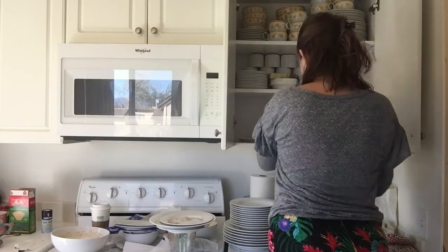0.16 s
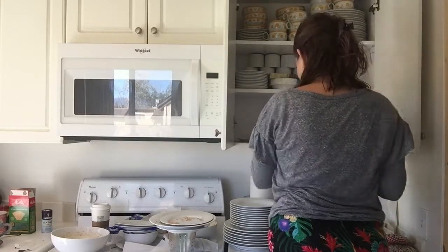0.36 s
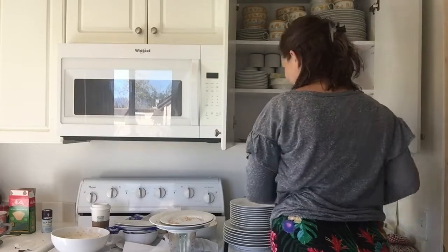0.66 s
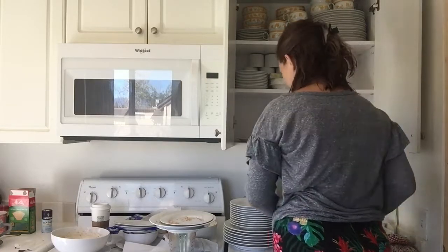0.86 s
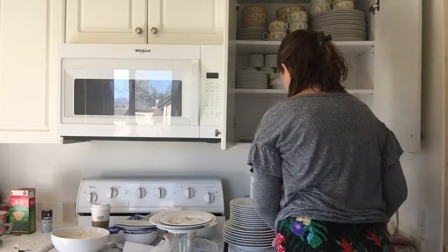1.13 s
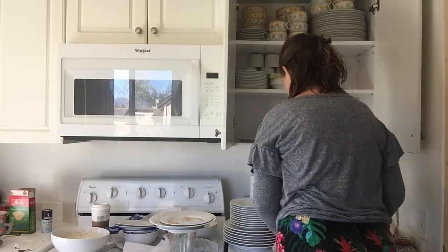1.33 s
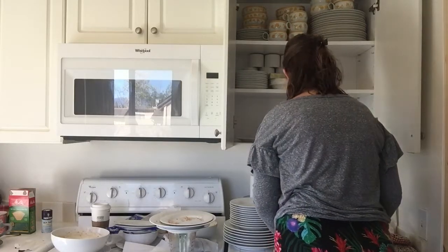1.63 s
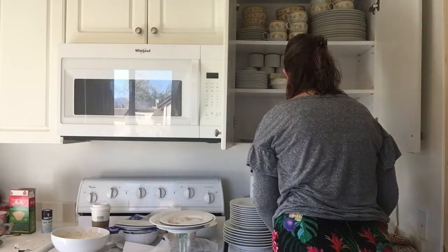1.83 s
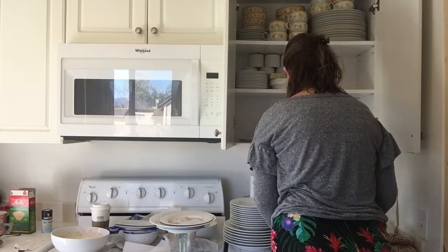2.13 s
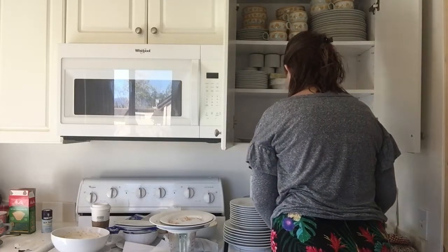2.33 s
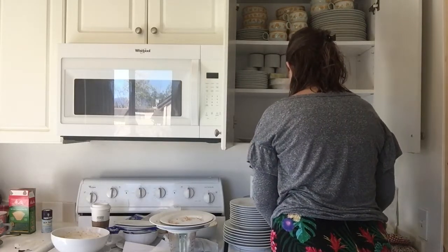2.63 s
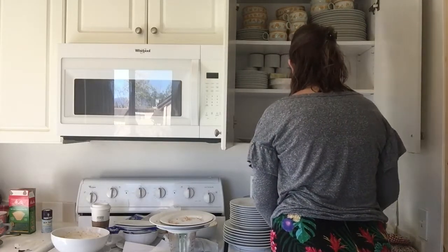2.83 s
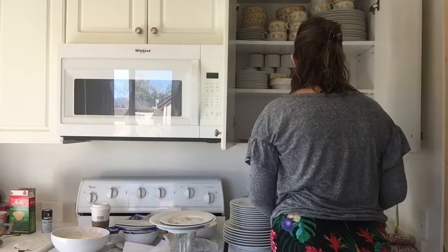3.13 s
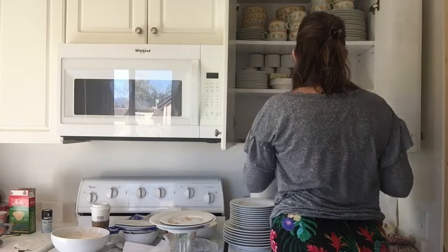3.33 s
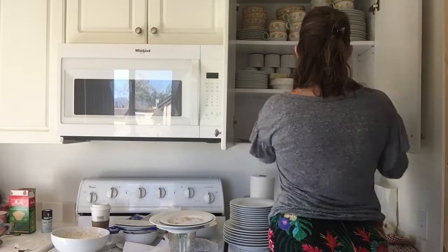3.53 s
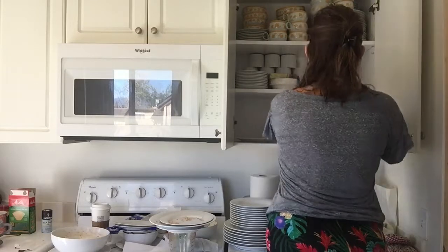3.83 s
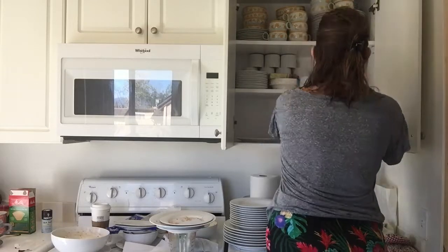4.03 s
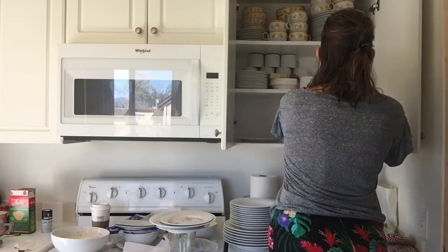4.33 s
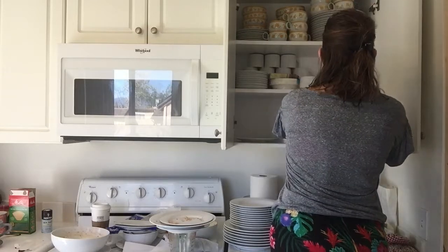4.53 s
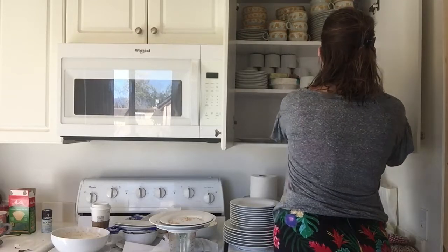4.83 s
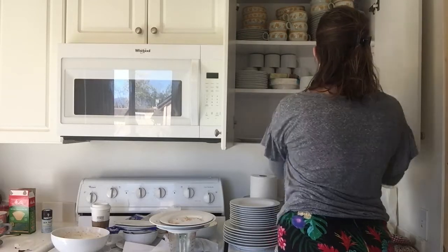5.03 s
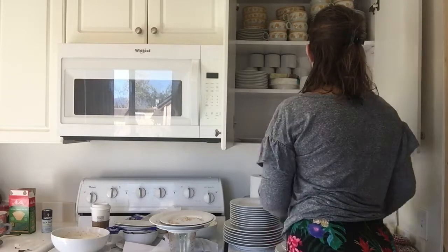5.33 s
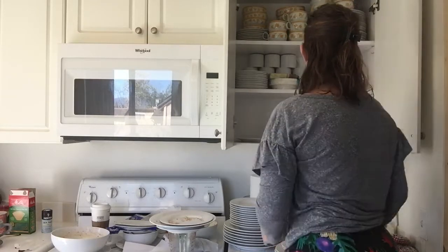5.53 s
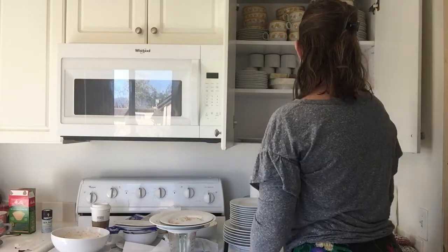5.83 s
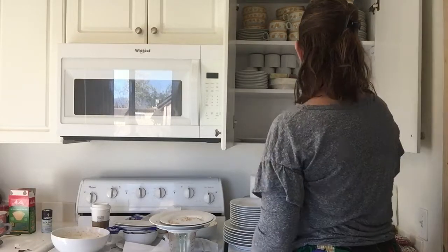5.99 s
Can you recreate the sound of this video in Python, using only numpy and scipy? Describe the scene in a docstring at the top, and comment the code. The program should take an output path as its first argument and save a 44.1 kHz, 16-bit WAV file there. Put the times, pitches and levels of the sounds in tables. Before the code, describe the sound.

Stoneware mugs clink and knock onto a wooden shelf in a kitchen, then a cupboard door knocks shut over a faint fridge hum.

```python
"""Stoneware mugs are lifted from a counter and set on a wooden shelf; then a cupboard door knocks shut.
Each contact is a chatter of impacts that excites the damped normal modes of ware and wood: a crack,
a thump and a ring. A body screens the direct path, so the kitchen's reverberation carries most of the
crack. A fridge hums as steady coloured noise; midway, a low amplitude-modulated throb passes outside."""
import sys
import numpy as np
from scipy import signal
from scipy.fft import rfft, irfft
from scipy.io import wavfile

SR = 44100
rng = np.random.default_rng(int(sys.argv[2]) if len(sys.argv) > 2 else 0)


def bounce(signal):
    """Save signal as a 16-bit WAV file at the path given by the first command-line argument."""
    frames = np.transpose(np.atleast_2d(signal))
    limited = np.clip(frames, -1, 1)
    pcm = np.round(limited * 32767).astype(np.int16)
    wavfile.write(sys.argv[1], SR, pcm)


N = 271656

# mug contacts on counter and shelf, then, after 5.4 s, the wooden knocks of a cupboard door:
# t/s, blow on ware/dB, blow on wood/dB, brightness/dB, ringing/dB,
# board note f/Hz, hollow note f/Hz, rim note f/Hz, glaze note f/Hz
IMPACTS = [(0.001, -44, -56, -11, -8.5, 528, 1142, 2100, 3500),
           (0.173, -54.5, -85, -17.5, 0.5, 382, 1450, 2650, 3560),
           (0.235, -55.5, -61, -8, 2.5, 440, 833, 2664, 7890),
           (0.265, -58.5, -65, -23, 6, 430, 850, 2357, 3380),
           (0.347, -41, -61, -18, 4, 425, 824, 1390, 8020),
           (0.371, -27, -45, -6.5, -9.5, 446, 1350, 2707, 8020),
           (0.495, -48.5, -53.5, -29, -3.5, 425, 1110, 2050, 3700),
           (0.623, -55, -59, -16, -4, 570, 1200, 1960, 3700),
           (0.646, -41.5, -33.5, 1.5, -19.5, 695, 940, 2110, 5700),
           (0.692, -27, -48.5, -13, -9.5, 440, 2080, 1500, 7375),
           (0.921, -68.5, -58, -30, 0.5, 482, 1040, 1261, 3300),
           (1.095, -47, -54.5, -22, -2, 436, 1053, 1740, 4700),
           (1.232, -68.5, -75, -8, 2, 390, 1380, 2277, 3300),
           (1.504, -64.5, -67, -35, -0.5, 505, 1290, 1640, 3300),
           (1.653, -18, -26.5, -3.5, -7.5, 360, 775, 4446, 6955),
           (1.748, -23.5, -29, -6.5, -6.5, 396, 1250, 2271, 4128),
           (1.875, -36.5, -29, -11, -20, 414, 734, 1540, 4500),
           (1.908, -20, -23.5, -3, -6.5, 330, 763, 1560, 4532),
           (1.986, -29, -45, -7, -9, 392, 1369, 2217, 7950),
           (2.09, -48, -44, -27, -11.5, 294, 1100, 2270, 3700),
           (2.143, -34.5, -22.5, -2.5, -29, 406, 1080, 1730, 3700),
           (2.163, -21.5, -35, -3.5, -5, 395.4, 1199, 2099, 5528),
           (2.45, -68.5, -42, -27, -27, 370, 950, 1580, 3500),
           (2.49, -50.5, -49, -33, -7, 266, 940, 1550, 3500),
           (2.529, -49, -66, -20, -1.5, 386, 1090, 2410, 3500),
           (2.576, -45, -57, -12, -25, 300, 1060, 2080, 4470),
           (2.61, -37.5, -39.5, -11, -7, 577, 1063, 2100, 4470),
           (2.645, -39.5, -52.5, -16, 2, 326, 1057, 2096, 5577),
           (2.75, -20.5, -40.5, -6.5, -13.5, 390, 936, 5517, 3550),
           (2.882, -41, -42, -11, -19, 312, 945, 2720, 5510),
           (2.917, -30, -45, -1.5, -8, 320, 1088, 3600, 7800),
           (2.94, -15.5, -29, -1.5, -10, 376, 1040, 2138, 5507),
           (2.966, -23, -41.5, -2, -5, 385, 1960, 4263, 5512),
           (3.33, -42.5, -52.5, -18.5, -3, 600, 1060, 2083, 4462),
           (3.44, -30, -47, -18.5, -12, 503, 1240, 2083, 3563),
           (3.46, -25.5, -43, -8.5, -8.5, 508, 1340, 2070, 7760),
           (3.535, -29, -51.5, -8, -5, 404, 744, 2670, 7830),
           (3.557, -27.5, -48.5, -8.5, -17, 410, 850, 2089, 5200),
           (3.764, -40, -62.5, -10, -9, 614, 1410, 2304, 7900),
           (4.039, -32, -69, -12.5, -6, 374, 870, 1697, 7730),
           (4.387, -16.5, -27, -0.5, -6, 381.5, 949, 3272, 6611),
           (4.733, -16, -29.5, 1, -3.5, 400, 1354, 2085, 4570),
           (5.447, -40.5, -37.5, 1, -16.5, 568, 838, 1280, 4100),
           (5.558, -30.5, -28.5, -2, -14.5, 709, 1050, 2950, 4085),
           (5.606, -63.5, -44, -20, 3, 546, 1000, 1507, 3200),
           (5.676, -52.5, -40.5, -29, -4, 490, 731, 1700, 3200),
           (5.712, -53.5, -51.5, -2.5, -18, 750, 1220, 2220, 4100),
           (5.822, -51.5, -44, -2.5, -8.5, 726, 900, 2320, 4100),
           (6.059, -39, -36.5, -6.5, -12, 723, 1395, 2260, 3300)]
# knock, boom, thud, clack, clink, tick and sparkle bands of an impact: lower f/Hz, upper f/Hz
IMPACT_BANDS = [(550, 1400), (55, 190), (215, 550), (1400, 3000), (3000, 6500), (6500, 8800), (8800, 14500)]
# gaps between the clusters of short modes that colour the crack: f/Hz, width/Hz, gain/dB
MODE_GAPS = [(650, 490, -5.5), (4860, 430, -7), (5880, 470, -6.5), (8700, 1100, -13.5), (10930, 480, -19.5),
             (13600, 930, -15.5)]
# normal modes of the stoneware: f/Hz, level/dB, T60/s
WARE_MODES = [(920, -16.5, 0.13), (1345, -9.5, 0.17), (1633.5, 3, 0.08), (1792, 4.5, 0.03),
              (2188, -5.5, 0.12), (2076, -8, 0.16), (5560, -6, 0.13), (3036, -5.5, 0.057),
              (3250, -10, 0.11), (3654, 0, 0.11), (4326, -2.5, 0.14), (4560, -5, 0.24), (6340, -2, 0.17),
              (6760, -3, 0.073), (7690, 2.5, 0.17), (8060, -1, 0.14), (9890, 8, 0.069), (11170, -1.5, 0.08),
              (12500, -12.5, .12), (14450, -15, .14)]
# normal modes of the wood (shelf, counter and door): f/Hz, level/dB, T60/s
WOOD_MODES = [(260, -11, 0.15), (302, -11.5, 0.099), (384.6, -7.5, 0.086), (444, -10, 0.64),
              (844, -18, 0.18), (1016, -12.5, 0.21)]
# board, hollow, rim and glaze notes: level/dB, T60/s, multiplier of the impact's ringing level
NOTE_MODES = [(24.5, 0.094, 0.85), (20.5, 0.12, 1.61), (17, 0.39, 1.07), (20.5, 0.14, 1.8)]
# reverberation time of the kitchen: f/Hz, T60/s
REVERB_TIMES = [(100, 0.22), (400, 0.23), (1200, 0.26), (4000, 0.27), (9000, 0.23), (15000, 0.16)]
# spectral density of fridge and room noise: f/Hz, relative level/dB
FRIDGE_SPECTRUM = [(25, -22.5), (43, -3), (84, -3), (117, 4), (185, -11), (256, -9.5), (659, -9.5),
                   (818, -10.5), (5570, -21), (16000, -29.5)]
# envelope of the throb: t/s, level/dB
THROB_ENVELOPE = [(2.25, -51), (2.42, -56.5), (2.7, -59), (3.3, -65.5), (3.899, -73), (4.353, -81)]
# resonances of the throb: f/Hz, width/Hz, relative level/dB
THROB_RESONANCES = [(278, 53, 13.5), (412, 56, 10.5)]


def amp(db):
    """Amplitude ratio of a level in decibels."""
    return 10 ** (np.asarray(db) / 20)


def at_hz(points, hz):
    """Interpolation of (f/Hz, value) points on a logarithmic frequency axis."""
    known_hz, values = np.transpose(points)
    return np.interp(np.log(hz), np.log(known_hz), values)


def band(x, low_hz, high_hz):
    """Butterworth band-pass filtering."""
    return signal.sosfilt(signal.butter(2, [low_hz, high_hz], "band", fs=SR, output="sos"), x + 1e-18)


def nearest_band(hz):
    """Index of the impact band whose geometric centre is closest in pitch."""
    return np.argmin(np.abs(np.log(hz ** 2 / np.prod(IMPACT_BANDS, axis=1))))


def chatter(count=6, spread_s=0.008, growth=0.2):
    """Settling: each contact divides unit energy among fading touches; heavy pieces settle longer."""
    start_s, blow_db = np.array(IMPACTS).T[:2, :, None]
    draw = rng.random((len(start_s), 2 * count))
    late = draw[:, :count] * (np.arange(count) > 0)
    sizes = np.exp(-1.5 * late) * (1 + draw[:, count:])
    sizes[:, 0] *= 0.55   # the first touch only grazes
    sizes /= np.sqrt(np.sum(sizes ** 2, axis=1, keepdims=True))
    touch_s = start_s + late * spread_s * amp(growth * (blow_db - blow_db.mean()))
    return np.clip((touch_s * SR).astype(int), 0, N - 1), sizes


def impulses(onsets, sizes, level_db):
    """Impulsive excitation: a click for each touch, with one level for each contact."""
    return np.bincount(onsets.ravel(), (sizes * amp(level_db)[:, None]).ravel(), N)


def impact_spectra(stiff_hz=492, stiff_db_per_octave=17):
    """Force, stiffness and contact damping set the level of each impact in each band."""
    ware, wood, bright, _, board_hz = np.array(IMPACTS)[:, 1:6].T
    stiffness_db = stiff_db_per_octave * np.maximum(np.log2(board_hz / stiff_hz), 0)
    knock = 8.5 + 0.54 * wood + 0.46 * ware
    thud = wood - stiffness_db   # a stiffer spot gives less thud and more sparkle
    boom = 6.5 + 1.545 * thud   # only heavy blows move the whole board
    tick = ware - 11 + bright + 0.22 * (ware - wood)   # wood damps the tick, and the sparkle still more
    sparkle = tick - 15.5 + 0.73 * np.minimum(ware - wood, 30)
    sparkle += 1.5 * np.maximum(bright, -8) + stiffness_db
    return np.stack([knock, boom, thud, ware, ware + bright, tick, sparkle], axis=1)


def crack(onsets, sizes, levels, gain_db=21):
    """Modal overlap: short modes merge into a broadband transient, notched between their clusters."""
    out = np.zeros(N)
    for (low, high), level in zip(IMPACT_BANDS, levels.T):
        clicks = impulses(onsets, sizes, level + gain_db)
        out += band(band(clicks, low, high), low, high) * np.sqrt(SR / 2 / (high - low))
    for hz, width_hz, gap_db in MODE_GAPS:
        radius = np.exp(-np.pi * width_hz / SR)
        feedback = [1, -2 * radius * np.cos(2 * np.pi * hz / SR), radius ** 2]
        in_gap = signal.lfilter(np.array([1, 0, -1]) * (1 - radius ** 2) / 2, feedback, out)
        out += (amp(gap_db) - 1) * in_gap
    return out


def modal_excitation(levels, ware_db=13, wood_db=8, spot_spread_db=3, favour_db=8, favour_width=0.026):
    """The point of impact sets each mode's level; modes near the board, hollow or rim note move most."""
    ringing_db, note_hz = np.array(IMPACTS)[:, 4], np.array(IMPACTS)[:, 5:8]
    modes = WARE_MODES + WOOD_MODES
    strengths = spot_spread_db * rng.standard_normal((len(levels), len(modes)))
    for k, (hz, mode_db, _) in enumerate(modes):
        nearness = np.exp(-(np.log(hz / note_hz) / favour_width) ** 2).max(axis=1)
        body_db = ware_db + ringing_db if k < len(WARE_MODES) else wood_db
        strengths[:, k] += levels[:, nearest_band(hz)] + body_db + mode_db + favour_db * nearness
    return strengths


def held_modes(onsets, sizes, strengths, gain_db=3):
    """Damping widens resonance: fingers and neighbours turn the modes into brief, broad humps."""
    out = np.zeros(N)
    for (hz, _, _), strength_db in zip(WARE_MODES + WOOD_MODES, strengths.T):
        half_width_hz = 45 + 0.012 * hz
        clicks = impulses(onsets, sizes, strength_db + gain_db)
        out += band(clicks, hz - half_width_hz, hz + half_width_hz) * np.sqrt(SR / 4 / half_width_hz)
    return out


def free_modes(onsets, strengths, piece_spread=0.012, swell_hz=48.6):
    """Free vibration: ware and wood ring as decaying sinusoids, no two pieces at quite the same pitch."""
    t = np.arange(SR // 3) / SR
    tuning = 1 + piece_spread * rng.standard_normal(strengths.shape)
    swell = 1 - np.exp(-2 * np.pi * swell_hz * t)   # the first reflections arrive
    out, tones = np.zeros(N + SR), 0
    for k, (hz, _, t60) in enumerate(WARE_MODES + WOOD_MODES):
        decay = amp(-60 * t / t60) * np.sqrt(4 * np.log(1000) / (t60 * SR))   # energy independent of T60
        tones += amp(strengths[:, [k]]) * swell * decay * np.sin(2 * np.pi * hz * tuning[:, [k]] * t)
    for start, tone in zip(onsets[:, 0], tones):
        out[start:start + len(t)] += tone
    return out[:N]


def resonator(clicks, hz, t60):
    """Damped harmonic oscillator whose impulse response has unit energy."""
    radius, angle = amp(-60 / (t60 * SR)), 2 * np.pi * hz / SR
    gain = np.sin(angle) * np.sqrt(2 * (1 - radius ** 2))
    return signal.lfilter([0, gain], [1, -2 * radius * np.cos(angle), radius ** 2], clicks + 1e-18)


def beating_notes(onsets, sizes, levels, split=0.0049):
    """Beats: the board, the air in a mug, its rim and its glazed wall each sound a close mode pair.
    The door's knocks sound four such pairs at their own pitches."""
    out = np.zeros(N + SR)
    detunings = 1 + split * rng.standard_normal((len(IMPACTS), len(NOTE_MODES)))
    for impact, touches, size, level, detuning in zip(IMPACTS, onsets, sizes, levels, detunings):
        _, _, wood_db, _, ringing_db, *note_hz = impact
        start = touches[0]
        clicks = np.bincount(touches - start, size, SR // 3)
        stiffness_db = wood_db - level[2]   # the board note gains what the thud loses
        drives = [wood_db + stiffness_db] + [level[nearest_band(hz)] for hz in note_hz[1:]]
        for hz, ratio, drive_db, (note_db, t60, share) in zip(note_hz, detuning, drives, NOTE_MODES):
            pair = resonator(clicks, hz, t60) + 0.5 * resonator(clicks, hz * ratio, t60 / 2)
            out[start:start + len(clicks)] += amp(drive_db + share * ringing_db + note_db) * pair
    return out[:N]


def kitchen(x, places=3, direct_db=-10.5, build_up_s=0.0025, wander_s=1.1):
    """Reverberation: after a screened direct sound, reflections build up and decay band by band."""
    t = np.arange(int(0.6 * SR)) / SR
    edges_hz = 50 * 2 ** np.arange(0, 8.5, 0.25)
    white = rng.standard_normal((2, places, len(t)))
    tails = 0
    for k, (low, high) in enumerate(zip(edges_hz, edges_hz[1:])):
        t60 = at_hz(REVERB_TIMES, np.sqrt(low * high))
        echoes = band(white[k % 2], low, high) * amp(-60 * t / t60) * (1 - np.exp(-t / build_up_s))
        tails += echoes * np.sqrt((high - low) / np.sum(echoes ** 2, axis=1, keepdims=True))
    tails /= np.sqrt(np.sum(tails ** 2, axis=1, keepdims=True))
    # the pattern of reflections changes as the hands move between counter and shelf
    weights = np.cos(np.pi * (np.arange(N) / SR / wander_s - np.arange(places)[:, None] / places)) ** 2
    weights /= np.sqrt(np.sum(weights ** 2, axis=0))
    return amp(direct_db) * x + signal.fftconvolve(x * weights, tails, axes=1)[:, :N].sum(axis=0)


def fridge(level_db=-68.5):
    """Stationary noise: fridge and room give a continuous spectrum, strongest in the bass."""
    hz = np.arange(N // 2 + 1) * SR / N + 1
    noise = irfft(rfft(rng.standard_normal(N)) * amp(at_hz(FRIDGE_SPECTRUM, hz)), N)
    return amp(level_db) * noise / noise.std()


def throb(pulse_hz=15.7, depth=0.7, crest_s=3.23):
    """Amplitude modulation: noise in two narrow, low resonances pulses evenly while it fades."""
    t = np.arange(N) / SR
    level_db = np.interp(t, *np.transpose(THROB_ENVELOPE), left=-120, right=-120)
    noise = sum(amp(db) * band(rng.standard_normal(N), hz - width / 2, hz + width / 2)
                for hz, width, db in THROB_RESONANCES)
    pulse = 1 + depth * np.cos(2 * np.pi * pulse_hz * (t - crest_s))
    return amp(level_db) * pulse * noise / noise.std()


def scene():
    """Superposition: mugs, cupboard door, reverberation, fridge and throb add in one channel."""
    onsets, sizes = chatter()
    levels = impact_spectra()
    strengths = modal_excitation(levels)
    cracks = crack(onsets, sizes, levels) + held_modes(onsets, sizes, strengths)
    rings = free_modes(onsets, strengths)
    notes = beating_notes(onsets, sizes, levels)
    room = kitchen(cracks + amp(2) * rings + amp(-2.5) * notes)
    return (room + amp(-1) * rings + notes + fridge() + throb())[None]


def record(dry, bass_cut_hz=52, stopband_hz=16274):
    """Band limiting: the small microphone loses the deep bass, and the top treble is cut steeply."""
    thin = signal.sosfilt(signal.butter(4, bass_cut_hz, "high", fs=SR, output="sos"), dry)
    return signal.sosfilt(signal.cheby2(14, 60, stopband_hz, fs=SR, output="sos"), thin)


dry = scene()
out = record(dry)
bounce(out)
```